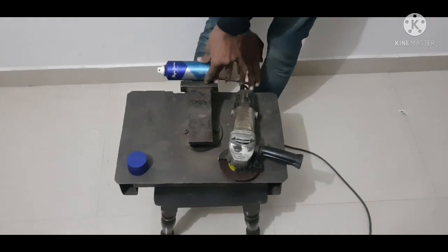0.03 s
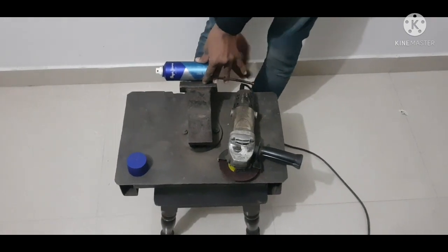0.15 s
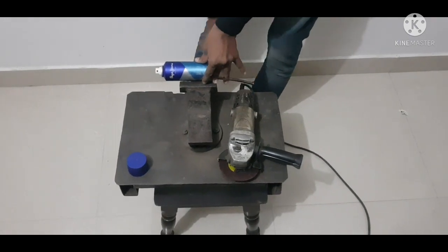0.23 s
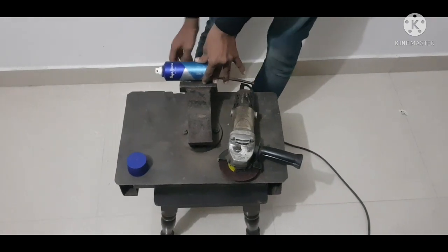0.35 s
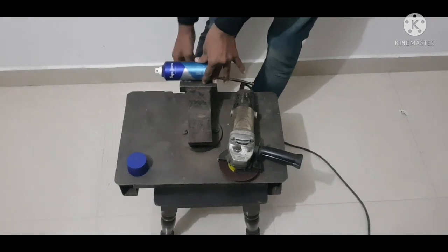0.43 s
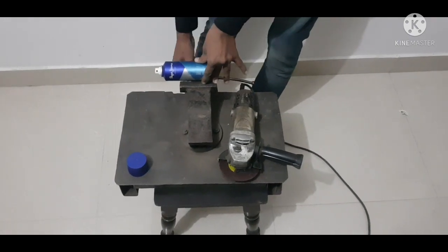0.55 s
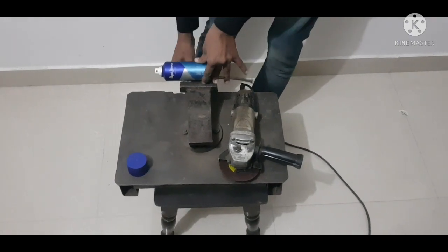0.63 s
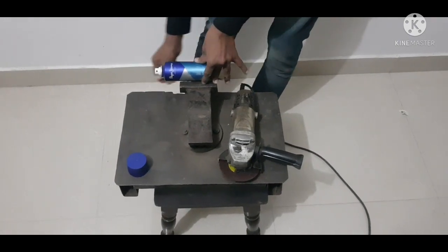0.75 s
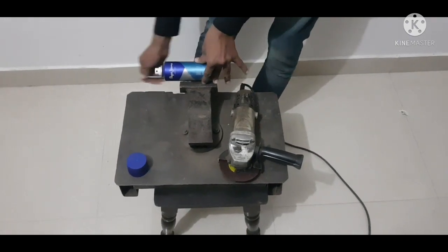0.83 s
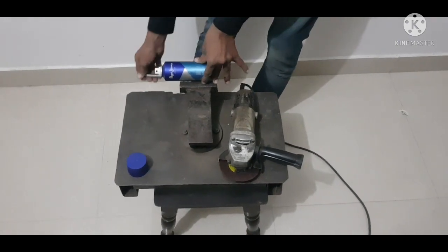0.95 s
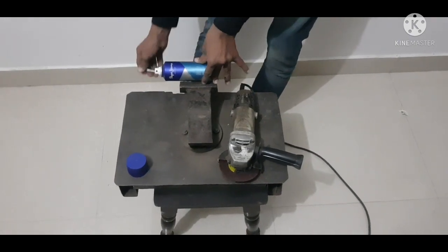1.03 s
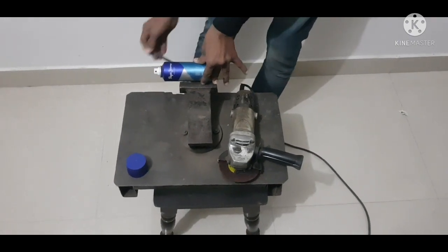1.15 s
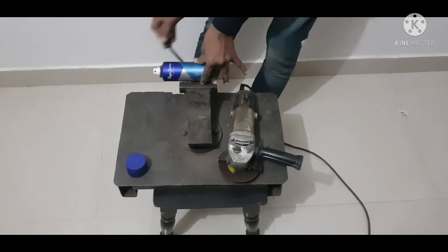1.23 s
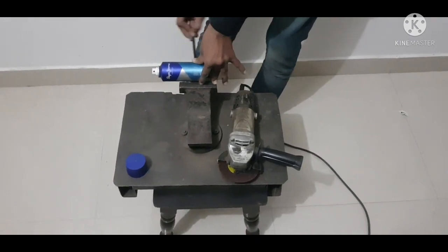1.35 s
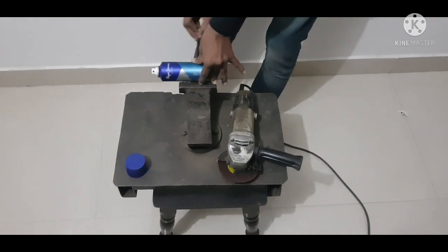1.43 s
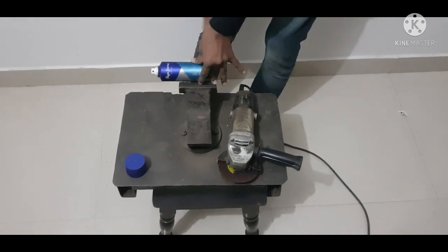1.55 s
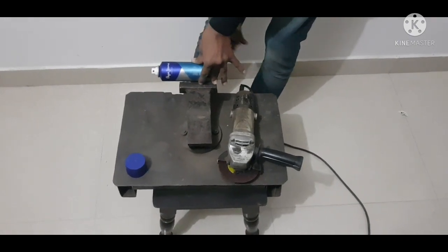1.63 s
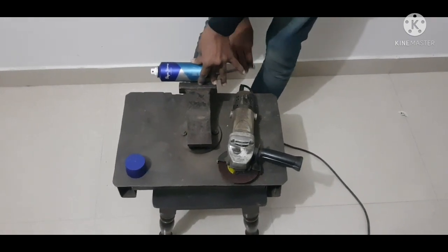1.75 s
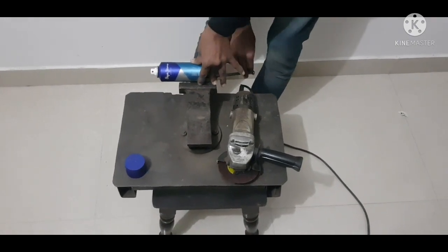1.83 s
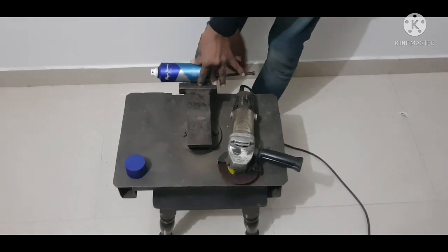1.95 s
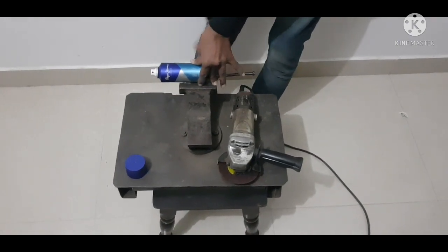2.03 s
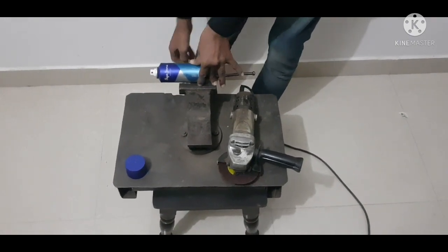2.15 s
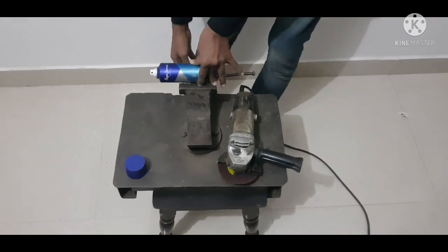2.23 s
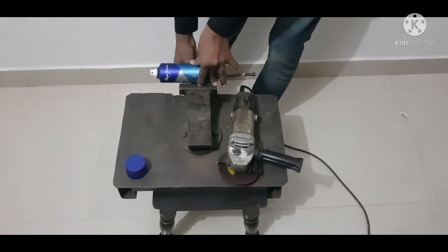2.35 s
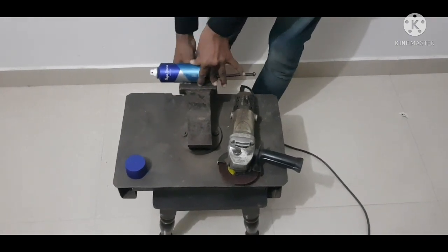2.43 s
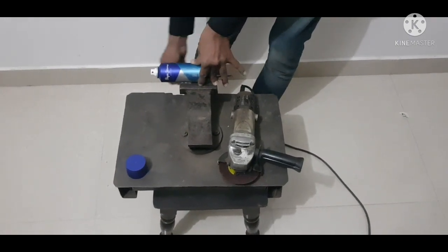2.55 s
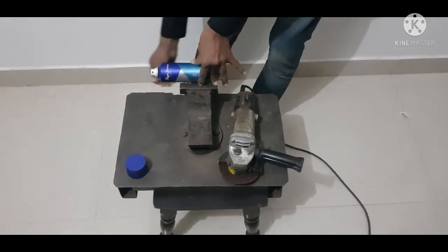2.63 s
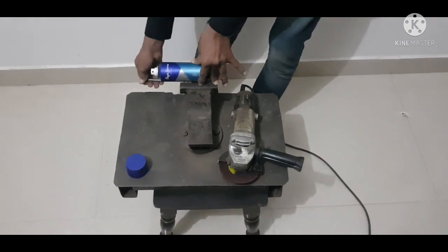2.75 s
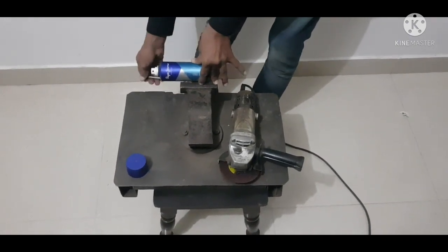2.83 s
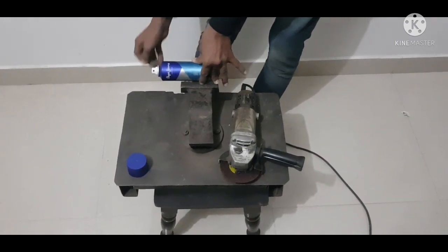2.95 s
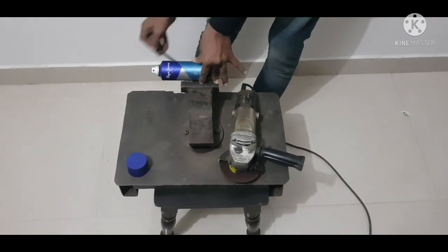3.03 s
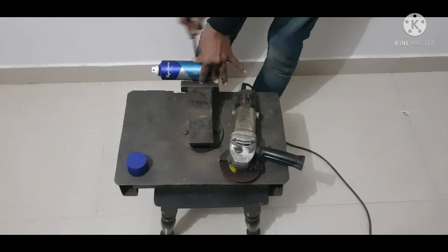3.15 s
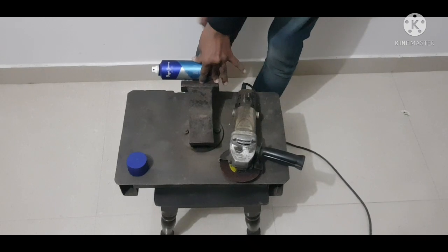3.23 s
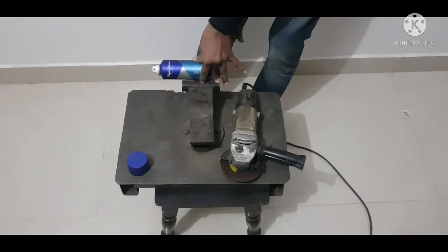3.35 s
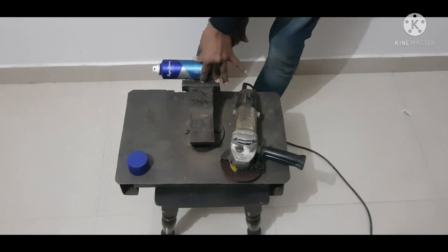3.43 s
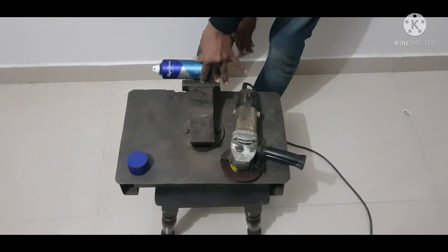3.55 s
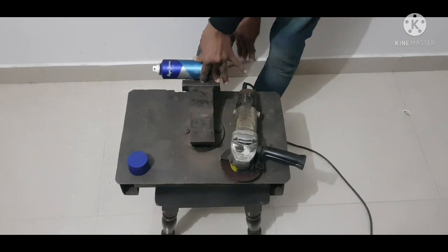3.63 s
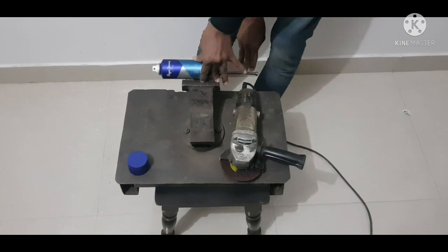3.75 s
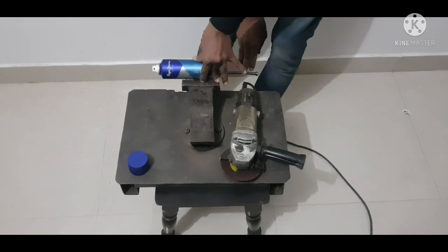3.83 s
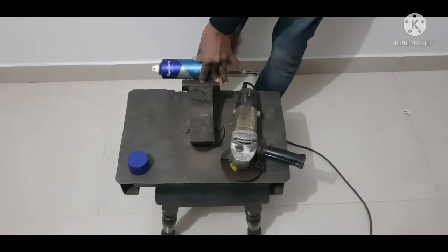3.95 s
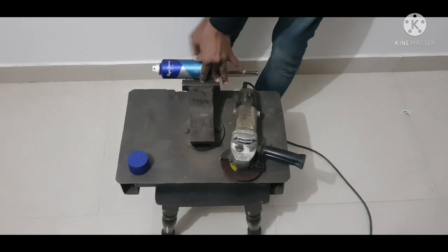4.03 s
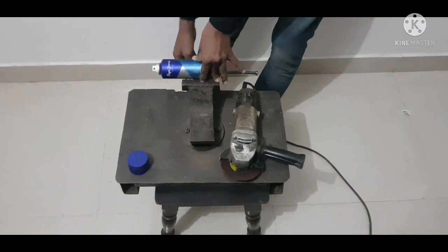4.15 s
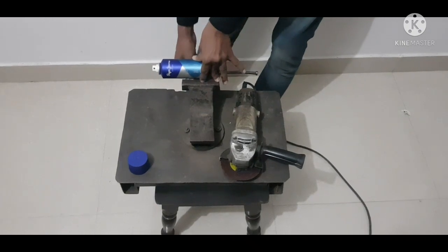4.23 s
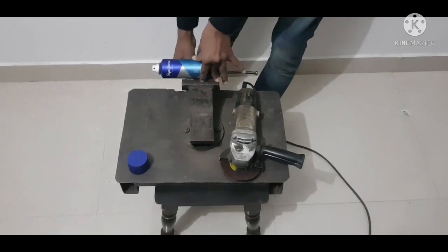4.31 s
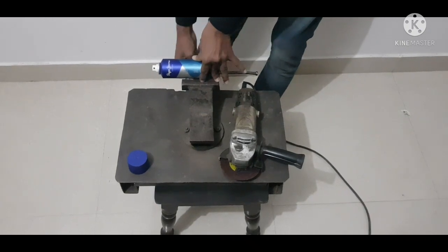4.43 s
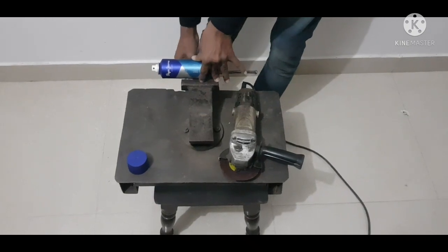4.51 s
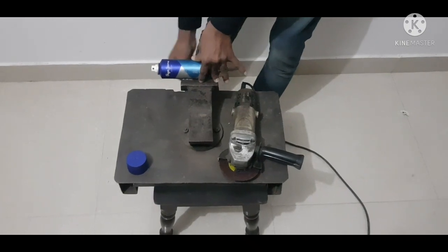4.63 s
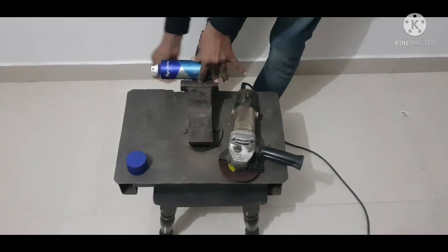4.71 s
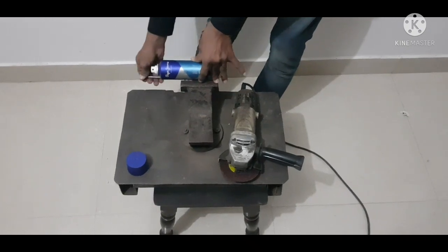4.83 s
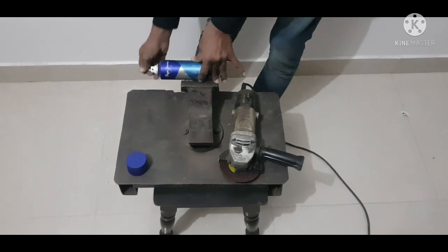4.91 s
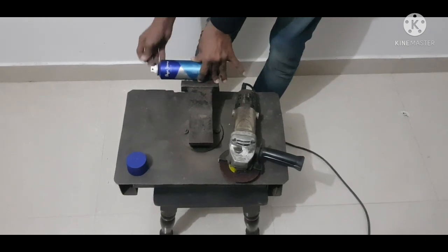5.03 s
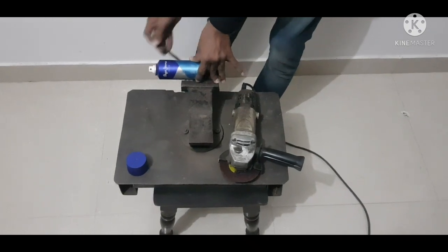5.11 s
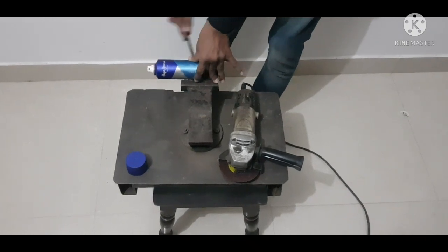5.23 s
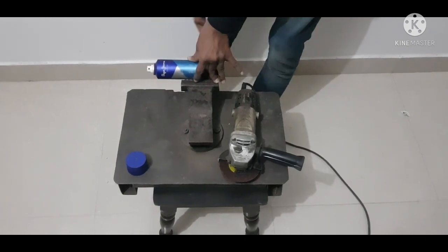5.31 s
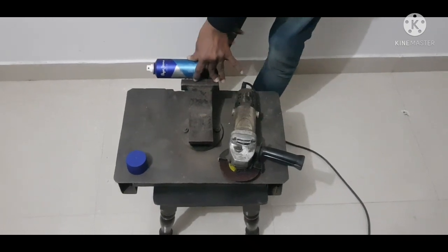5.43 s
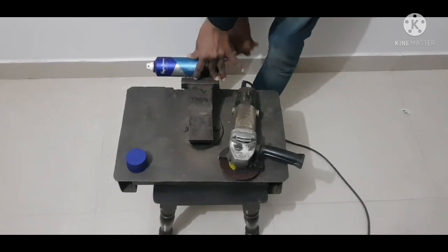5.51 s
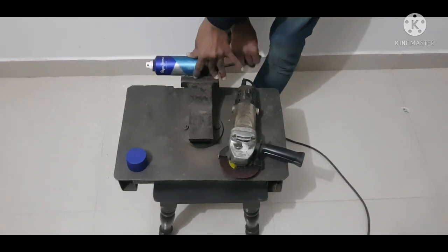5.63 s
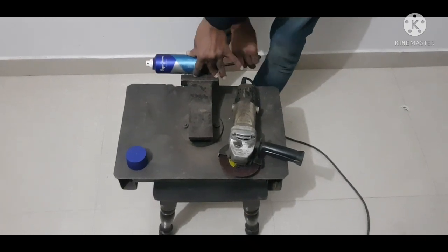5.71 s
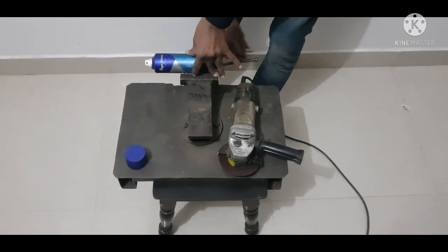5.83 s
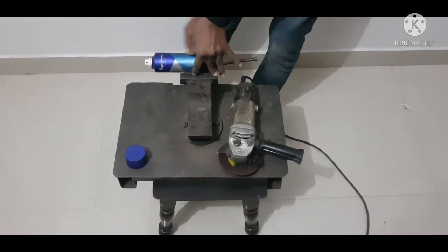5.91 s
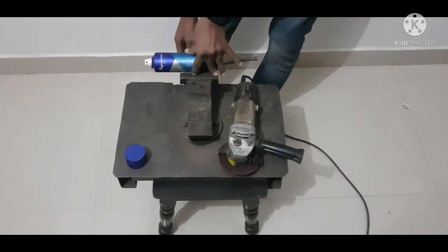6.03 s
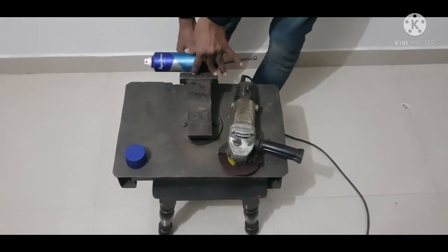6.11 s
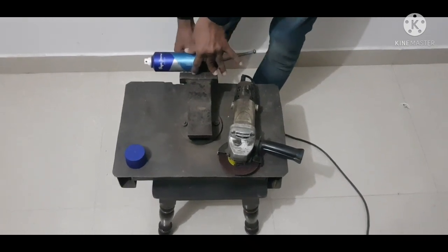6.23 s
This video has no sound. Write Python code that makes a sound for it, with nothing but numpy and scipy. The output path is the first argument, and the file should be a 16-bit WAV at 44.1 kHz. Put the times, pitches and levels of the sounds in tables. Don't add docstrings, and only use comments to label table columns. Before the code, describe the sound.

Close stereo pickup in a bare, reverberant tiled room. At about 0.2 seconds a heavy hollow thud shakes a low wooden table, with quick rebounds and a little loose chatter. Near 0.74 a short accelerating metal scrape leads to two light taps, then a hard ringing clank at 0.9. A barely audible knock and shuffle come at 1.3, then sleeve rustle, and another boomy thud at 1.97. A scrape and two steel clanks follow at 2.6 and 2.76, the second ringing on in the casting. Soft cloth passes around 3.3; a thud lands at 3.9. A low air pop at 4.47 precedes a faint tap at 4.69 and the loudest, sharpest clank at 4.82. A light knock at 5.68 runs into a final double thud at 5.8. Faint hiss, slightly stronger after 1.6, low draught buffets and foot shifts continue underneath until the end, about 6.3.

```python
import sys
import numpy as np
from scipy import signal
from scipy.fft import rfft, irfft, next_fast_len
from scipy.io import wavfile
from scipy.ndimage import uniform_filter1d, map_coordinates

SR = 44100
rng = np.random.default_rng(int(sys.argv[2]) if len(sys.argv) > 2 else 0)


def elevation(decibels):
    levels = np.asarray(decibels, float)
    return 10 ** (levels / 20)


def int16_out(signal):
    q = np.round(np.clip(np.atleast_2d(signal).T, -1, 1) * 32767)
    wavfile.write(sys.argv[1], SR, q.astype(np.int16))


N = 276507
TAIL = 29000

# pitch_hz, level_db, t60_s
BAR_MODES = [(1843, -10, 0.48), (4970, -6.5, .1), (7620, -5, 0.11), (10920, -2, 0.25), (11470, -3.5, 0.078),
             (15400, -11.5, .12)]
# pitch_hz, level_db, t60_s
HEAD_MODES = [(1093, -10, 0.1), (1406, -4, 0.46), (1547, -8, 0.52), (2553, -4.5, 0.16), (2813, -9, 0.1),
              (3240, -5.5, 0.11), (3680, -9, .1), (4210, -1, 0.11), (4470, -3, 0.084), (5510, 3, 0.084),
              (5900, -2, 0.13), (6060, -4.5, 0.041), (9340, -9, 0.055), (10000, -14.5, 0.049),
              (13000, -6.5, 0.038), (14100, -15.5, .06)]
# pitch_hz, level_db, t60_s
ROOM_MODES = [(129, -3, .22), (188, -15, .55), (248, -3, .48), (277, -14, .3), (368, 0, .48),
              (427, -8, .38), (492, -8, .35), (545, -10, .35), (582, -12, .5), (630, -9, .33),
              (698, -2, .2), (758, -3, .22), (790, -9, .3), (900, -19, .3), (1105, -13, .45),
              (1150, -13, .28), (1270, -18, .42), (2105, -17, .3)]
# frequency_hz, level_db (per Hz)
STEEL_COLOUR = [(100, -28), (465, 2.5), (1000, -8), (2000, 3.5), (3400, -5.5), (5000, -8), (7000, -14.5),
                (9300, -15), (11200, -5.5), (12500, -13), (13500, -23), (15500, -15.5), (16600, -32)]
# frequency_hz, correlation (-1 to 1)
PORT_LIKENESS = [(60, 0.27), (130, 0.92), (290, 1), (640, 0.71), (1410, -0.041), (3100, -0.0032),
                 (6820, 0.12), (15000, -0.5)]


def unit(x):
    return x / np.sqrt(np.mean(x ** 2) + 1e-20)


def along(points, hz):
    f, v = np.transpose(points)
    return np.interp(np.log(hz + 1), np.log(f + 1), v)


def wobble(rate):
    knots = rng.standard_normal(int(N * rate / SR) + 4)
    return map_coordinates(knots, [np.arange(N) * rate / SR])


def filtered(x, response):
    m = next_fast_len(x.shape[-1] + 8192)
    spectrum = rfft(x, m) * response(np.fft.rfftfreq(m, 1 / SR))
    return irfft(spectrum, m)[..., :x.shape[-1]]


def port_angle(likeness, hz):
    return np.arccos(np.clip(along(likeness, hz), -1, 1)) / 2


def diffuse(size, gain, alike=PORT_LIKENESS):
    def mid_side_gain(hz):
        angle = port_angle(alike, hz)
        return gain(hz) * [np.cos(angle), np.sin(angle)]

    mid, side = filtered(rng.standard_normal((2, size)), mid_side_gain)
    return unit(np.array([mid + side, mid - side]))


def echo(gain, swell, corner_hz, first):
    # frequency_hz, t60_s
    room_t60 = [(100, 0.11), (200, 0.58), (500, 0.43), (1400, 0.5), (2700, 0.38), (5400, 0.35),
                (11000, 0.24)]
    hz, t, z = signal.stft(diffuse(TAIL, gain), SR, nperseg=256)
    rise = np.abs(swell) / (1 + (hz[:, None] / corner_hz) ** 2) + 1e-4
    growth = 1 - (1 - first) * np.exp(-(t / rise) ** 2)
    decay = elevation(-60 * t / along(room_t60, hz)[:, None])
    return signal.istft(z * growth * decay, SR, nperseg=256)[1][:, :TAIL]


def ringing(modes, swell, scatter_db, beat):
    t = np.arange(TAIL) / SR
    hz, db, t60 = np.transpose(modes)[:, :, None]
    strength, phase, beat_rate, beat_phase = rng.standard_normal((4, len(modes), 1))
    apart = port_angle(PORT_LIKENESS, hz)
    beating = 1 + beat * np.cos(2 * np.pi * 9 * beat_rate * t + 2 * beat_phase)
    size = elevation(db + scatter_db * strength - 60 * t / t60) * beating
    lines = [size * np.sin(2 * np.pi * hz * t + 2 * phase + side * apart) for side in (1, -1)]
    return np.sum(lines, axis=1) * (1 - np.exp(-(t / np.abs(swell)) ** 2))


def resonant(modes, widen):
    return lambda f: np.sqrt(sum(elevation(2 * db) / (1 + ((f - c) * t60 / widen) ** 2) for c, db, t60 in modes))


def swells(start, end, db, rise, fall):
    t = np.arange(N)[:, None] / SR
    drop_db = np.maximum(rise * (start - t), fall * (t - end))
    return elevation(db - np.maximum(0, drop_db)).sum(axis=1)


def add(out, s, sound):
    out[:, round(s * SR):round(s * SR) + TAIL] += sound


def clanks():
    # start_s, blow_db, then relative to the blow body_db, bar_ring_db, head_ring_db
    stop_blows = [
        (0.737, -39, -10.5, -8, -4),
        (0.7751, -32, -4.5, 3.5, -2),
        (0.8986, -20, -14.5, -2, 2.5),
        (2.606, -24.5, -11.5, -2.5, -6),
        (2.7619, -26.5, 0.5, -3.5, 13.5),
        (4.6878, -32.5, -27.5, -26, 0),
        (4.824, -12, -16, -5.5, 1),
    ]
    touches = [(0.768, -38, -10, 10.5, 2), (2.6, -28.5, -27, -1.5, -20), (4.81, -28, -15, -5, -3.5)]
    out = np.zeros((2, N + TAIL))
    bar, head = resonant(BAR_MODES, widen=8), resonant(HEAD_MODES, widen=5)
    for s, db, body_db, bar_db, head_db in [*stop_blows, *touches]:
        boom_db = -14.5 - 0.31 * (db + 27.5)
        tilt = [(500, boom_db + 19), (1800, body_db + 5), (5000, 0), (12000, bar_db + 12.5)]

        def colour(hz):
            crack = elevation(along(STEEL_COLOUR, hz) + along(tilt, hz) - 1)
            return crack + elevation(bar_db + 11.5) * bar(hz) + elevation(head_db + 1) * head(hz)

        answer = echo(colour, swell=0.022, corner_hz=700, first=.15)
        direct = elevation(bar_db - 7.5) * ringing(BAR_MODES, 0.00019, scatter_db=2.5, beat=1.0)
        direct = direct + elevation(head_db - 22) * ringing(HEAD_MODES, 0.004, scatter_db=6.5, beat=.5)
        snap = elevation(-60 * np.arange(TAIL) / SR / 0.016 - 4.5) * answer
        boom = ringing(ROOM_MODES, 0.031, scatter_db=2, beat=1.0)
        add(out, s, elevation(db - 3.5) * (answer + snap + direct + elevation(boom_db + 1.5) * boom))
    return out[:, :N]


def thuds():
    # start_s, blow_db, boom_db, swell_s, hollow_db (upper room modes)
    table_blows = [
        (0.1712, -17.5, 1.5, 0.03, 7.5),
        (1.289, -56.5, 4.5, 0.016, 7),
        (1.971, -22.5, 2.5, 0.024, 2),
        (3.8955, -22.5, 4, 0.027, 1),
        (5.684, -40, -4, 0.013, 7.5),
        (5.7977, -23, 1, 0.022, 6),
    ]
    further_blows = [(.2, -21.5, 5.9, 0.0097, 4.5), (0.234, -33.5, 10, 0.0047, 2), (2.0, -28, 6.2, 0.022, 1),
                     (3.945, -28, 3.5, 0.0029, 3.5), (4.0, -54, 11, 0.0071, 3), (5.831, -25, 8.4, 0.023, 3.5)]
    # frequency_hz, level_db (per Hz)
    wood = [(70, -45.5), (120, -15), (240, -10), (310, -10.5), (400, -3.5), (700, -8), (950, -16.5),
            (1200, -17), (1500, -16), (2500, -15.5), (3300, -25), (7500, -38.5), (11000, -41.5),
            (16000, -62.5)]
    out = np.zeros((2, N + TAIL))
    t = np.arange(TAIL) / SR
    for s, db, boom_db, swell, hollow_db in [*table_blows, *further_blows]:
        tilt = [(400, boom_db - 10), (700, boom_db + hollow_db - 9.5), (2000, 0.00034), (8000, -0.5)]
        knock = echo(lambda hz: elevation(along(wood, hz) + along(tilt, hz)), swell, corner_hz=4070, first=0.22)
        clatter = elevation(-0.5 + 4 * wobble(150)[:TAIL] - 60 * t / .2)
        knock = knock * (1 + clatter)
        modes = [(hz, level + hollow_db * (520 < hz < 1000), t60) for hz, level, t60 in ROOM_MODES]
        boom = ringing(modes, 1.1 * swell, scatter_db=2, beat=0.31)
        add(out, s, elevation(db) * (elevation(-8.0) * knock + elevation(boom_db - 8.5) * boom))
    return out[:, :N]


def lingering():
    # start_s, pitch_hz, level_db, t60_s
    favoured = [(.19, 1091, -44, 1), (.19, 1270, -52, .8), (.19, 700, -32, 0.23), (.2, 368.4, -33, 0.51),
                (.9, 1408, -50.5, 0.66), (.9, 1540, -54, .6), (.9, 4860, -36, 0.31),
                (0.901, 5560, -35.5, 0.31), (2.606, 428, -35, 0.38), (2.7625, 5574, -44, .3),
                (2.7621, 496.4, -38, 0.35), (2.7626, 365, -43.5, 0.34), (2.7627, 2408, -37.5, .25),
                (2.7625, 4250, -52, 0.34), (2.7625, 1410, -54.5, 0.7), (2.7628, 4020, -63.5, 1.16),
                (3.91, 248, -35, .5), (3.91, 680, -36, .25), (4.6875, 3610, -44, 0.36),
                (4.6873, 4201, -43, .35), (4.6872, 4990, -44, .35), (4.66, 11311, -49, .6),
                (4.8244, 4600, -28, 0.24), (4.8247, 7572, -33, 0.28), (4.8245, 1950, -37, 0.19),
                (4.825, 3320, -36.5, 0.23), (5.81, 1860, -53.5, 0.98), (.91, 249, -47, .5),
                (2.64, 247.4, -44.5, .5), (1.29, 1100, -60.5, .25)]
    wake_cycles = 8
    smear = 0.0054
    out, t = np.zeros((2, N + TAIL)), np.arange(TAIL) / SR
    for s, hz, db, t60 in favoured:
        band = diffuse(TAIL, lambda f: 1 / (1 + ((f - hz) / (smear * hz + 2)) ** 2))
        build_up = 1 - np.exp(-t * hz / wake_cycles)
        add(out, s, elevation(db - 60 * t / t60) * build_up * band)
    return out[:, :N]


def slides():
    # stop_s, scrape_db, groan_db, gain_db_per_s
    runups = [(0.731, -58.5, -63, 418.5), (2.545, -61, -63, 450), (4.682, -49.5, -57, 297),
              (6.27, -77, -75, 204)]
    # start_s, end_s, scrape_db, groan_db, dying_db_per_s
    glides = [(2.56, 2.595, -49, -53, 294), (0.82, 0.88, -51, -59.5, 305), (2.67, 2.755, -49, -46.5, 298),
              (4.7, 4.832, -48.5, -54, 300.5), (5.05, 5.036, -59, -47.5, 150)]
    catch = 900
    stop, *runup_db, gain = np.transpose(runups)
    start, end, *glide_db, dying = np.transpose(glides)
    rub, load = [swells(stop, stop + .012, fall_db, gain, catch) + swells(start, end, glide, catch, dying)
                 for fall_db, glide in zip(runup_db, glide_db)]
    sing, head = resonant(BAR_MODES, widen=7), resonant(HEAD_MODES, widen=6)

    def scrape_colour(hz):
        rasp = elevation(along(STEEL_COLOUR, hz) - 9) * (hz < 12400)
        return rasp + sing(hz) + elevation(-4) * head(hz)

    scrape = diffuse(N, scrape_colour)
    groan = diffuse(N, resonant(ROOM_MODES, widen=4.3))
    grit = elevation(3 * wobble(400))
    return rub * grit * scrape + load * elevation(0.8 * wobble(30)) * groan


def swishes():
    # middle_s, half_length_s, level_db, brightest_hz
    strokes = [(0.03, 0.067, -76.5, 2000), (1.313, 0.06, -76.5, 2400), (1.749, 0.11, -71.5, 3060),
               (1.912, 0.029, -73.5, 3500), (3.053, .08, -76, 1810), (3.17, .05, -77, 2010),
               (3.27, 0.089, -71, 5050), (3.453, 0.076, -72.5, 1700), (3.701, .12, -75.5, 3500)]
    # frequency_hz, level_db (per Hz)
    cloth_colour = [(410, -24.5), (700, -4), (884, -10), (1220, -7.5), (1410, -6.5), (2080, -7.5),
                    (10000, -12.5), (13000, -48), (22000, -120)]
    rest = elevation(-84) * diffuse(N, lambda hz: elevation(along(cloth_colour, hz)))
    cloth = np.pad(rest, [(0, 0), (0, TAIL)])
    for s, half, db, top_hz in strokes:
        start = max(s - 2 * half, 0)
        stroke = np.exp(-((np.arange(TAIL) / SR + start - s) / half) ** 2)

        def colour(hz):
            octaves = np.log2((hz + 1) / top_hz)
            return elevation(along(cloth_colour, hz) - 5.2 * (octaves / 1.8) ** 2)

        add(cloth, start, elevation(db) * stroke * diffuse(TAIL, colour))
    return cloth[:, :N] * elevation(0.56 * wobble(51))


def footwork():
    # start_s, end_s, level_db
    treads = [(1.27, 1.299, -63.5), (1.535, 1.55, -59.5), (2.403, 2.5, -65), (3.05, 3.12, -70),
              (3.694, 3.757, -69), (4.411, 4.476, -65.5), (4.583, 4.621, -59.5), (5.363, 5.4, -76.5),
              (5.5, 5.57, -58), (6.0, 6.145, -55)]
    # start_s, end_s, level_db
    shuffles = [(0, .05, -58.5), (0.154, 0.165, -70), (1.279, 1.315, -54), (1.944, 1.96, -65),
                (2.3, 2.305, -76), (2.402, 2.424, -64.5), (3.039, 3.056, -73.5), (4.25, 4.264, -77),
                (4.604, 4.617, -64), (5.31, 5.367, -76.5)]
    # frequency_hz, level_db (per Hz)
    tread_colour = [(80, -28.5), (120, -0.5), (150, 9.5), (200, -4), (280, -40)]
    # frequency_hz, level_db (per Hz)
    shuffle_colour = [(59, -44.5), (100, -17.5), (491, 5.5), (897, -17), (1100, -5.5), (1680, -37),
                      (2000, -26), (2600, -38.5), (4400, -120)]
    weight = elevation(-80) + swells(*np.transpose(treads), rise=400, fall=160)
    drag = elevation(-84.5) + swells(*np.transpose(shuffles), rise=420, fall=140)
    tread = weight * elevation(-8.0 + 1.5 * wobble(4)) * diffuse(N, lambda hz: elevation(along(tread_colour, hz)))
    shuffle = drag * elevation(-6.0 + 2.6 * wobble(6.7)) * diffuse(N, lambda hz: elevation(along(shuffle_colour, hz)))
    return tread + shuffle


def draught():
    # start_s, end_s, buffet_db, left_over_right_db
    gusts = [(0.06, 0.144, -62, -13.5), (.2, .3, -60, -2.5), (0.396, .59, -41.5, -6.5),
             (0.663, .7, -60, -4.5), (.93, 1.02, -64, -2.5), (1.06, 1.5, -73, -6.5), (1.7, 1.784, -71, 3),
             (1.96, 2.175, -61.5, -2), (2.35, 2.42, -71, 5), (2.637, 2.707, -42, -6), (2.755, 2.9, -44, -5),
             (2.987, 3.1, -55.5, -11), (3.2, 3.247, -61, 7), (3.3, 3.45, -72, 0), (3.616, 3.74, -62, -1),
             (3.92, 3.98, -59.5, 3), (4.05, 4.184, -62.5, 1), (4.305, 4.38, -69.5, 3),
             (4.48, 4.49, -57.5, 18), (4.604, 4.656, -63, -5.5), (4.75, 4.9, -67, 4.5),
             (4.963, 5.13, -59.5, -1), (5.321, 5.4, -53, 3.5), (5.497, 5.618, -63, -7),
             (5.71, 5.78, -58.5, -14), (5.82, 5.899, -45.5, -6.5), (5.98, 6.097, -56.5, -7.5),
             (6.183, 6.269, -64, -13)]
    # frequency_hz, level_db (per Hz)
    buffet = [(12, -39), (20, -10.5), (38, -4), (59, 7.5), (100, -4.5), (166, -18.5), (195, -32),
              (300, -27.5), (390, -46), (660, -120)]
    # start_s, level_db, first_hz, last_hz, life_s (to fall 20 dB)
    puff = (4.467, -37, 150, 60, .04)
    start, end, gust_db, pan_db = np.transpose(gusts)
    still_air = elevation(-80.5)
    push = [still_air + swells(start, end, gust_db + side * pan_db, rise=300, fall=199.5)
            for side in (.5, -.5)]
    lumps = elevation(2 * np.array([wobble(20), wobble(20)]))
    swirl = diffuse(N, lambda hz: elevation(along(buffet, hz)), alike=[(50, 0.072)])
    power = np.abs(uniform_filter1d(swirl ** 2, size=SR // 16))
    eddies = unit(lumps * swirl / np.sqrt(power + 0.057))
    s, db, first_hz, last_hz, life = puff
    t = np.maximum(np.arange(N) / SR - s, 0)
    pitch = (last_hz + (first_hz - last_hz) * np.exp(-t / .008)) * (t > 0)
    envelope = elevation(db - 20 * t / life) * (1 - np.exp(-t / .004))
    pop = envelope * np.sin(2 * np.pi * np.cumsum(pitch) / SR)
    return elevation(-4.0) * np.array(push) * eddies - pop * [[1], [.1]]


def microphone_hiss():
    # frequency_hz, level_db (per Hz)
    hiss_colour = [(59, -42.5), (100, -6), (138, 0), (250, -8), (529, -10), (811, -23), (1570, -19.5),
                   (4110, -23.5), (4570, -28.5), (5090, -22), (6710, -27.5), (7470, -54), (10500, -13.5),
                   (14800, -18), (16500, -35.5)]
    level_db = -76 + 4.5 * (np.arange(N) > 1.58 * SR)
    hiss = diffuse(N, lambda hz: elevation(along(hiss_colour, hz)), alike=[(200, 0.27), (1200, 0.0096)])
    return elevation(level_db) * hiss


def scene():
    vise = clanks() + thuds() + lingering() + slides()
    return vise + swishes() + footwork() + draught() + microphone_hiss()


def band_limit(x):
    return signal.sosfilt(signal.butter(12, 16610, fs=SR, output="sos"), x)


def record(dry):
    # frequency_hz, left_over_right_db
    lean = [(60, -1.5), (110, -1), (200, -3), (380, -1.5), (700, 0), (1290, -3), (2380, -2.5), (4400, -4),
            (8120, 1.5), (11000, 5), (14000, -7)]
    ports = filtered(dry, lambda hz: elevation(along(lean, hz) * [[.5], [-.5]]))
    return band_limit(ports)


dry = scene()
out = record(dry)
int16_out(out)
```